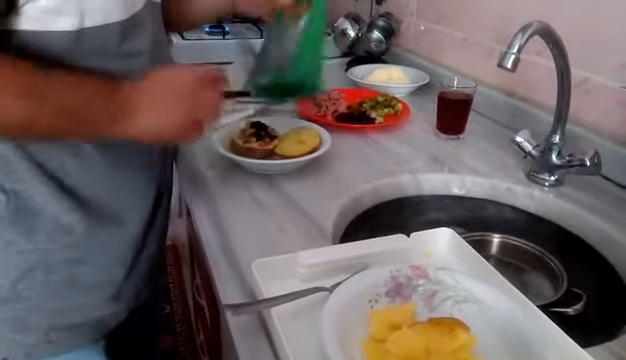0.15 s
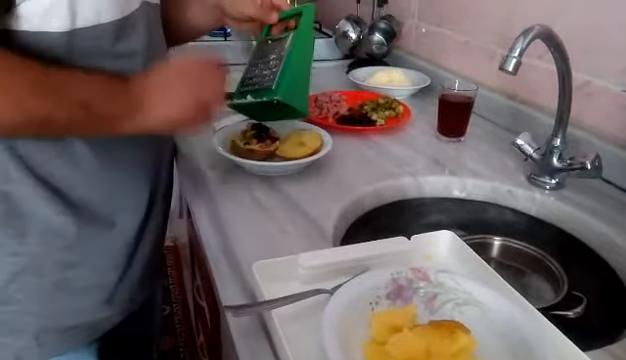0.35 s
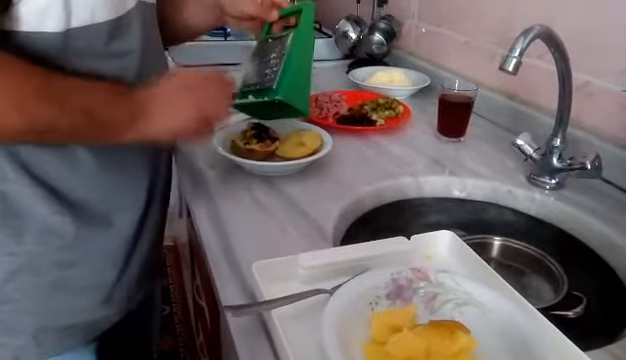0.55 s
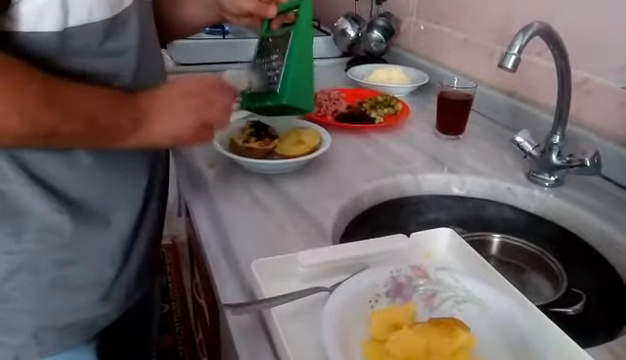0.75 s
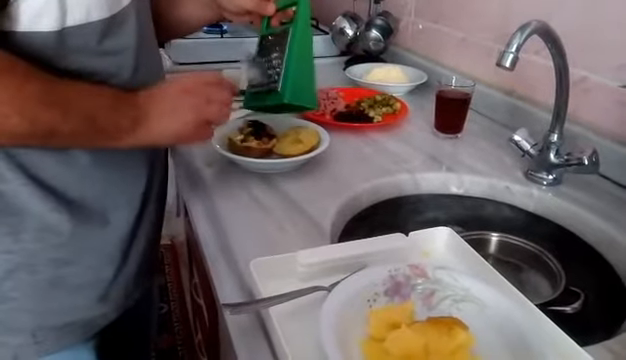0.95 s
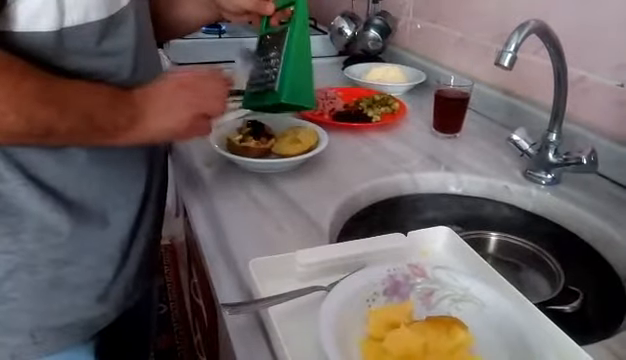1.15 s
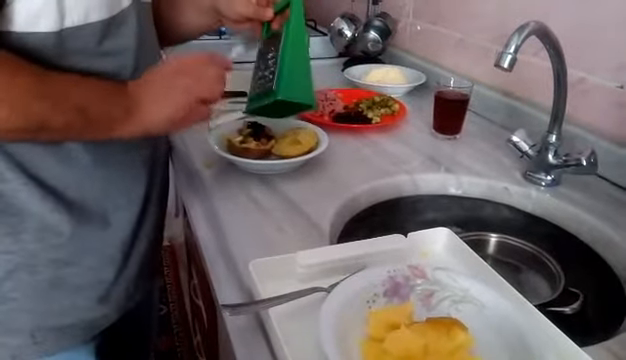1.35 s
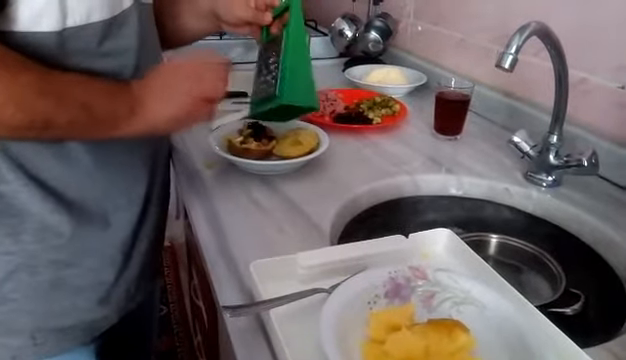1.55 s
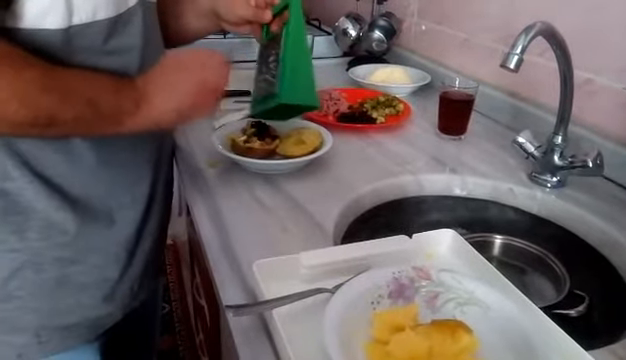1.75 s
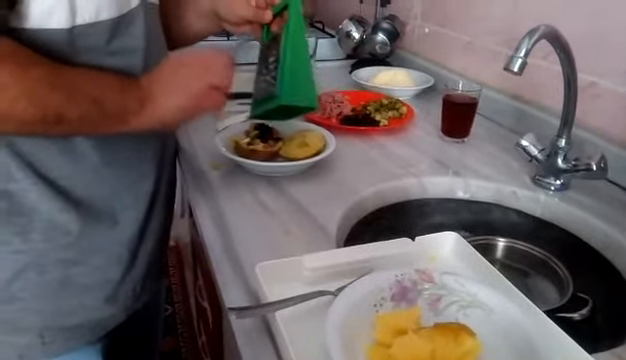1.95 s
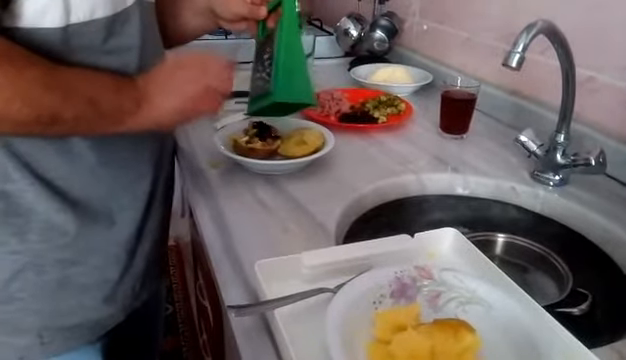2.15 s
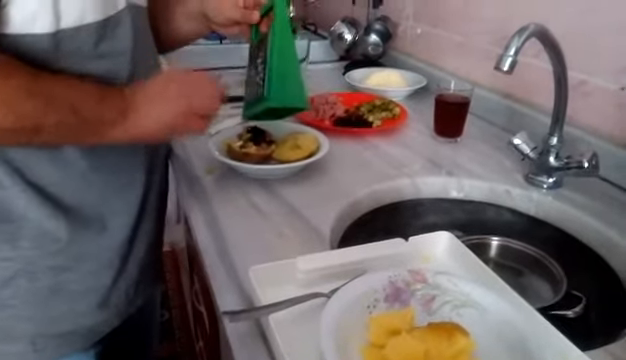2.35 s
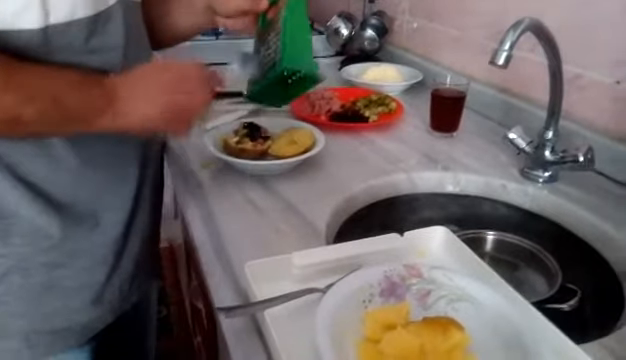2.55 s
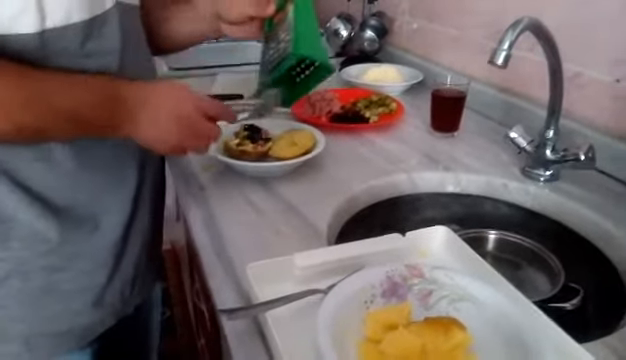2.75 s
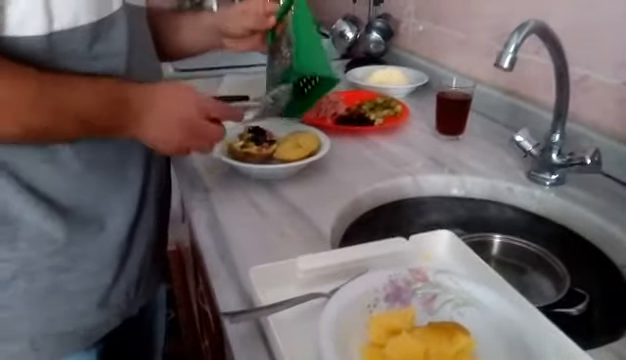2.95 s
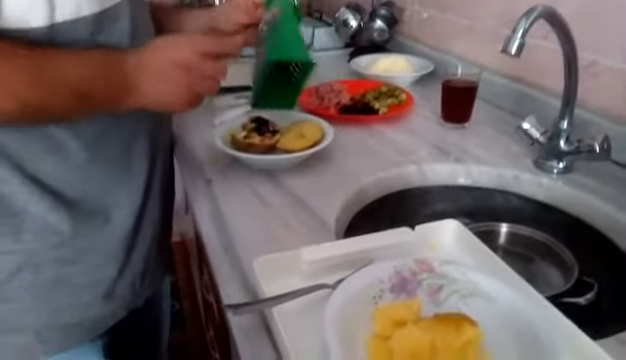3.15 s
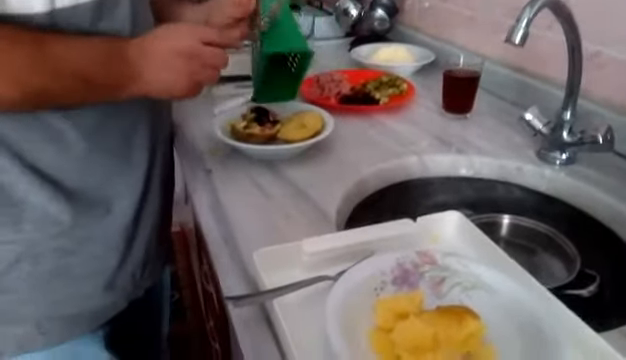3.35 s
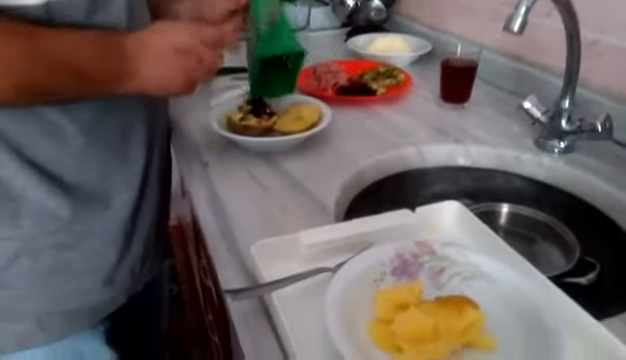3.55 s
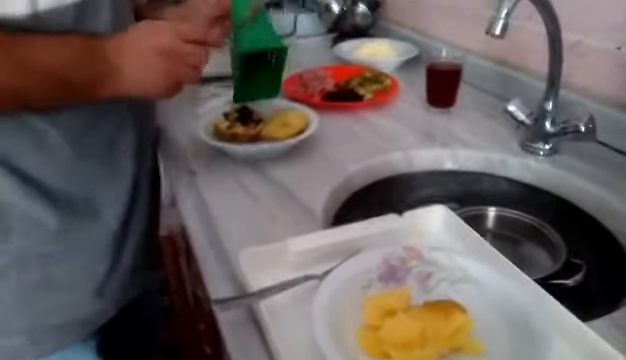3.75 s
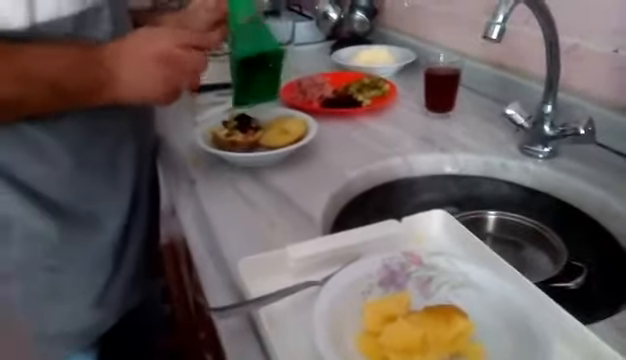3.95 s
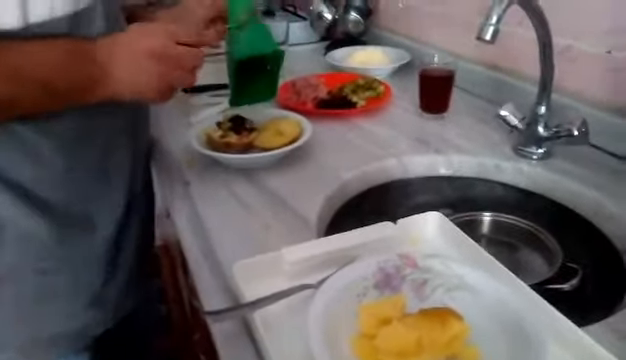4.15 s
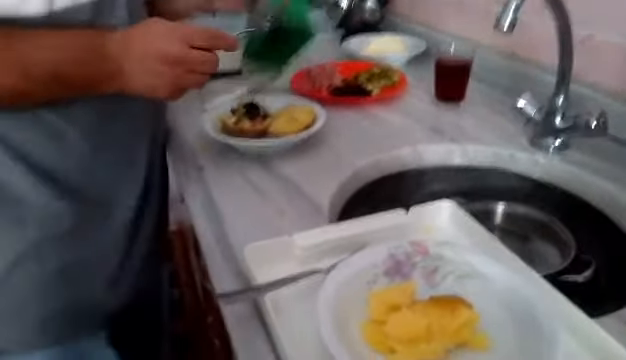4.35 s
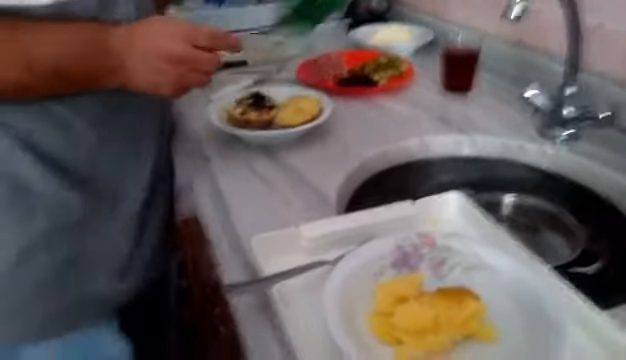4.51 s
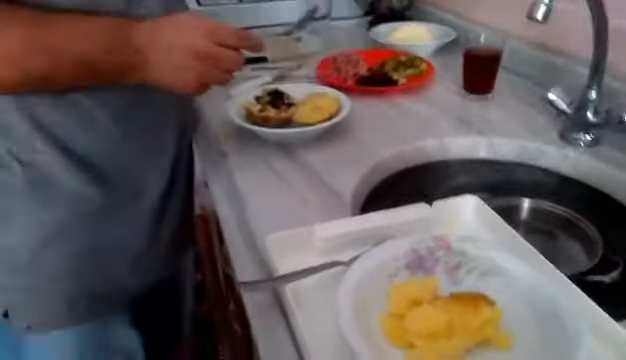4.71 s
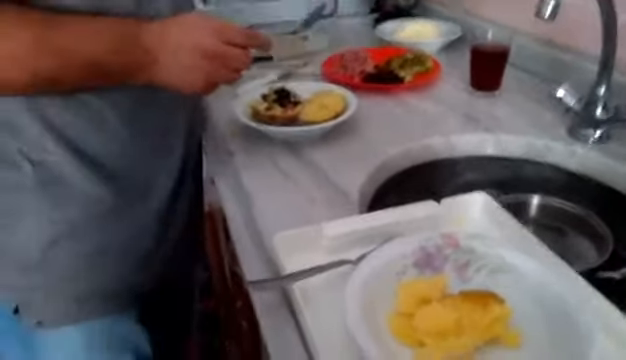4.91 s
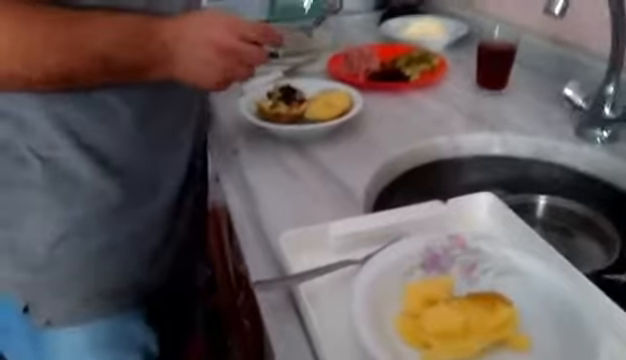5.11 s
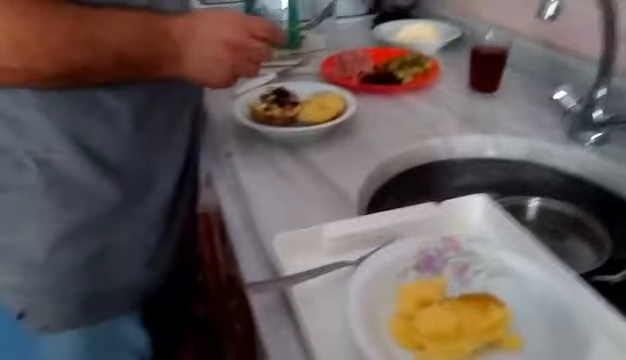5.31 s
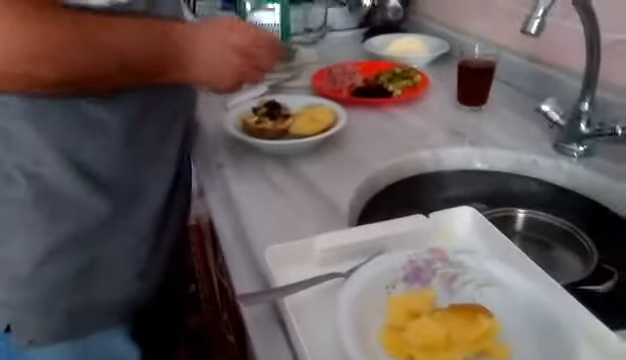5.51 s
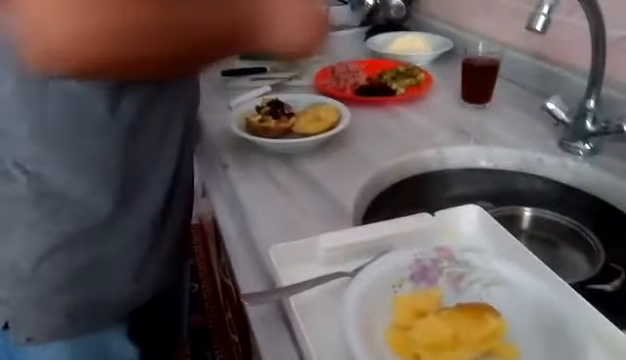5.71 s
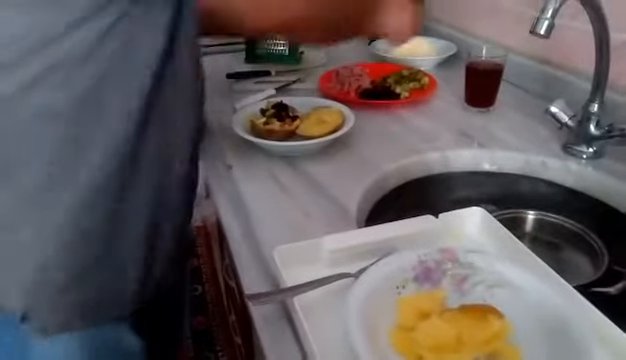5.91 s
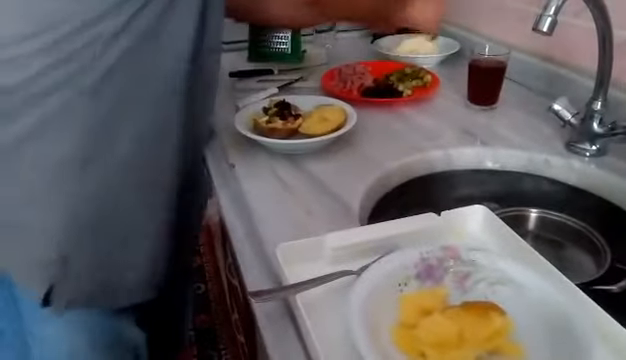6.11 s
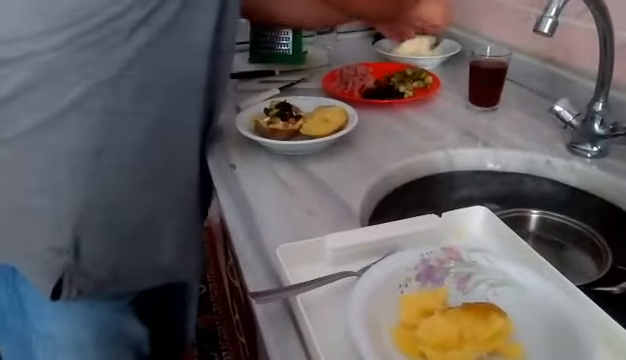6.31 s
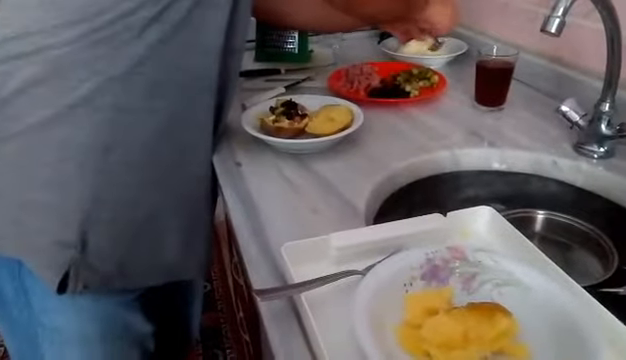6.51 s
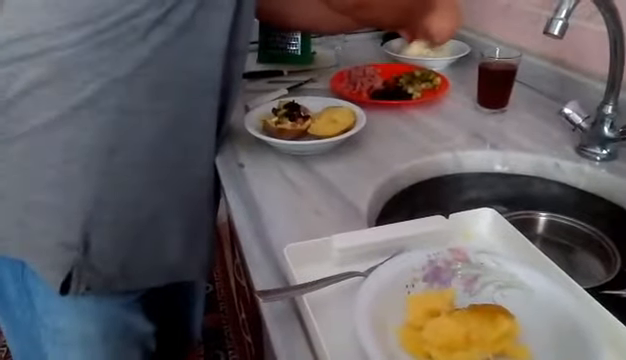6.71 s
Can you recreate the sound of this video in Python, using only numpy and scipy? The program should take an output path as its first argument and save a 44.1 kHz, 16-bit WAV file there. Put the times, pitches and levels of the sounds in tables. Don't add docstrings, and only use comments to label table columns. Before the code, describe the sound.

A small, hard-tiled kitchen, heard through a bright, slightly hissy close microphone, with a low wavering refrigerator hum behind. After faint contact ticks, at about 0.45 s a knife handle starts rapping a hollow sheet-metal box grater: six loud blows, roughly six per second, until 1.25 s. Each is a sharp, tinny clang with loose rattle, brief ringing, a hollow boxy swell and short echo. A second run of six, at a changed pitch, goes from 1.5 to 2.4 s, slightly uneven. The ring dies away, with tiny ticks near 2.9 and 3.2 s. A faint touch at 3.4 s leads into four strong raps from 3.55 to 4.05 s. Then it is quiet: a light blade scrape peaks near 4.7 s, another near 5.25 s, and the grater rubs and clunks softly onto the counter around 5.4 s. A faint high rustle of shreds swells near 6.2 s, with a soft dish tap at 6.3 s, leaving hum and hiss.

```python
import sys
import numpy as np
from scipy import signal
from scipy.fft import rfft, irfft
from scipy.io import wavfile
from scipy.ndimage import map_coordinates

SR = 44100
rng = np.random.default_rng(int(sys.argv[2]) if len(sys.argv) > 2 else 0)


def boost_factor(decibels):
    exponent = np.asarray(decibels, float) / 20
    return 10 ** exponent


def inscribe(sig):
    pcm = np.round(np.clip(np.atleast_2d(sig).T, -1, 1) * 32767)
    wavfile.write(sys.argv[1], SR, pcm.astype(np.int16))


N = 298557
RAP_SAMPLES = 2 ** 15
BOX_SWELL_S = 0.02

# frequency in Hz, level in dB per Hz.
RAP_SPECTRUM = [(150, -28), (300, -12), (550, -12.5), (850, -11.5), (1000, -6), (1500, 2.5), (2090, -8),
                (2500, -8), (6170, -3.5), (8130, -21.5), (13600, -35), (14800, -22.5), (15600, -56),
                (16100, -48)]


def rms_one(x):
    return x / np.sqrt(np.mean(x ** 2) + 1e-20)


def at_hz(points, hz):
    p = np.array(points)
    return np.interp(np.log(np.maximum(hz, 1)), np.log(p[:, 0]), p[:, 1])


def colour(x, *spectra):
    hz = np.fft.rfftfreq(len(x), 1 / SR)
    log_gain = sum(at_hz(s, hz) for s in spectra) * np.log(10) / 20
    cepstrum = irfft(log_gain, len(x))
    cepstrum[1:len(x) // 2] *= 2
    cepstrum[len(x) // 2 + 1:] = 0
    return irfft(rfft(x) * np.exp(rfft(cepstrum)), len(x))


def decay(t, t60):
    return boost_factor(-60 * t / t60)


def drift(rate):
    knots = rng.standard_normal(int(40 * N / SR))
    return map_coordinates(knots, [np.arange(N) / SR * rate + 2], order=3)


def add(out, s, x):
    i = round(s * SR)
    out[i:i + len(x)] += x[:N - i]


def raps():
    # low boom in dB, middle clang in dB, upper ring in dB.
    blows = [(0.462, -5, 1, -3, 0.2), (0.619, -7, -3.5, -1, -4.5), (0.773, -5.5, -1, 0.1, 2),
             (0.929, -2, -1, 0.5, 3), (1.084, -6.5, 0.5, -5.5, 4.9), (1.246, -4, 0, -2.5, 1.5),
             (1.529, -2, 0.9, 0, 2.5), (1.692, -3, 3.5, 1, -1.5), (1.912, -4, 0, -6.5, -3.5),
             (2.079, -3.5, 2, -10.5, 0.6), (2.23, -3.5, 1, -0.5, 2), (2.387, -3, 2.5, 2, -0.5),
             (3.408, -33, 17, 8, -1), (3.545, -1.5, 3, -2.3, -0.5), (3.723, -1, -1.5, -3.5, 1.7),
             (3.879, -2, 0.6, -4.5, 4), (4.045, -1, 0, -2, 3), (5.365, -28, 9.5, 7.5, -2),
             (5.382, -26.5, -4, -6, -4)]
    turns_s = [
        1.4,
        3.0,
        5.0,
    ]
    out, t = np.zeros(N), np.arange(RAP_SAMPLES) / SR
    rooms = kitchen(count=len(blows), first_echo_s=0.0055)
    for (s, db, boom_db, clang_db, ring_db), room in zip(blows, rooms):
        wall = np.searchsorted(turns_s, s) % 3
        firm = db > -20
        ring, lasting, air_chance = wall_ring(wall, t)
        rattle = sheet_rattle(t)
        rung_room = irfft(rfft(ring + 0.69 * rattle) * rfft(room), RAP_SAMPLES)

        heard = rattle + ring + boost_factor(-6) * firm * lasting + boost_factor(-7) * room + boost_factor(-33.5) * rung_room
        heard = colour(heard, RAP_SPECTRUM, blow_shade(wall, db, boom_db, clang_db, ring_db))
        heard /= np.sqrt(np.mean(heard[:SR // 60] ** 2))
        heard += box_air(t, boom_db, air_chance) + handle_thump(wall, t)

        i = round(s * SR)
        dip = np.clip(np.arange(4700) / 500, 0, 1)
        out[i - 700:i + 4000] *= boost_factor(-8.5 * firm * dip)
        add(out, s, heard * boost_factor(db - 13))
    return out


def wall_ring(wall, t):
    # frequency in Hz, level in dB, t60 in the room in seconds.
    walls = [
        [(750, -17, .3), (990, -8, .2), (1180, -3, .15), (1265, -8, .25), (1510, -4, .22), (2030, -2, .16),
         (2130, -3, .14), (2820, -8, .15), (4300, -8, .15), (5700, -6, .15), (6075, -4, .12)],
        [(750, -14, .3), (985, -4, .25), (1175, -7, .15), (1395, -6, .3), (1520, -5, .2), (1625, -7, .3),
         (2010, -3, .2), (2840, -8, .15), (4300, -6, .12), (5680, -5, .12), (5900, -6, .15)],
        [(555, -16, .4), (755, -16, .35), (1005, -7, .2), (1180, -4, .15), (1390, -1, .35), (1620, -2, .4),
         (1900, -5, .15), (2690, -8, .18), (4230, -8, .15), (5990, -4, .15), (6300, -6, .15)],
    ]
    modes = np.array(walls[wall])
    chance = rng.standard_normal((3, len(modes)))
    hz = modes[:, 0] * (1 + 0.005 * chance[0])
    modes_db, strike_spread_db = -15, 4
    mode_db = modes[:, 1] - at_hz(RAP_SPECTRUM, hz) + modes_db + strike_spread_db * chance[1]
    height = boost_factor(mode_db)
    box_fed = np.minimum(t / BOX_SWELL_S, 1) ** 2
    waves = np.sin(2 * np.pi * np.outer(hz, t)) * np.where(hz[:, None] < 1100, box_fed, 1)
    t60 = modes[:, 2:]
    ring = height @ (waves * decay(t, np.minimum(0.2 * t60, 0.05)))
    lasting = height * (hz < 2400) @ (waves * decay(t, np.minimum(t60, 0.4)))
    return ring, lasting, chance[2, 0]


def sheet_rattle(t):
    rattle = rng.standard_normal(RAP_SAMPLES) * decay(t, 0.11) * np.clip(t / 0.001, 0, 1)
    return rattle * boost_factor(2.5 * np.repeat(rng.standard_normal(512), 64))


def blow_shade(wall, db, boom_db, clang_db, ring_db):
    shade_hz = [500, 1030, 1500, 2080, 3500, 5900, 9000]
    # usual colour in dB near 1.0, 1.5, 2.1 and 6 kHz.
    wall_shades = [
        (-2.5, -2, 1.3, 5.2),
        (-5, -4, 2.1, 4.66),
        (-4, 2, 2.4, 3.9),
    ]
    soft_dulls = 0.04
    low, mid, upper, top = np.array(wall_shades[wall]) + [boom_db, clang_db, ring_db, soft_dulls * db]
    return list(zip(shade_hz, [1.21 * low, low, mid, upper, 0, top, top]))


def box_air(t, boom_db, chance):
    box_hz, box_db, sag = 968.7, -16, 0.16
    swell = (t / BOX_SWELL_S * np.exp(1 - t / BOX_SWELL_S)) ** 3
    sagging = t + sag * BOX_SWELL_S / 2 * (1 - np.exp(-2 * t / BOX_SWELL_S))
    tone = np.sin(2 * np.pi * box_hz * (1 + 0.028 * chance) * sagging)
    return boost_factor(box_db + boom_db) * swell * tone


def handle_thump(wall, t):
    thump_hz = [307, 301, 211]
    thump_db = [-22, -24.5, -25.5]
    thump = np.sin(2 * np.pi * thump_hz[wall] * t) * decay(t, 0.11)
    return boost_factor(thump_db[wall]) * thump * np.clip(t / 0.011, 0, 1)


def kitchen(count, first_echo_s):
    edges_hz = [140, 400, 800, 1300, 2300, 4500, 8000, 13000, 18000]
    # frequency in Hz, t60 in seconds.
    room_t60 = [(300, 0.53), (1400, 0.42), (3700, 0.34), (7000, 0.27), (10000, 0.21), (15000, 0.18)]
    t = np.arange(RAP_SAMPLES) / SR
    echoes = np.zeros((count, RAP_SAMPLES))
    for low, high in zip(edges_hz, edges_hz[1:]):
        band_filter = signal.butter(2, [low, high], "band", fs=SR, output="sos")
        band = signal.sosfilt(band_filter, rng.standard_normal(RAP_SAMPLES))
        dying = decay(t, at_hz(room_t60, np.sqrt(low * high)))
        echoes += [np.roll(band, 1511 * k) * dying for k in range(count)]
    echoes[1:] = 0.6 * echoes[0] + 0.8 * echoes[1:]
    return echoes * np.clip(t / first_echo_s - 1, 0, 1)


def ticks():
    # start in seconds, peak in dB, ring in Hz, t60 in seconds.
    contacts = [(.0800, -41.5, 3200, 0.04), (0.0815, -28, 480, 0.014), (0.908, -30, 2530, .003),
                (0.919, -20.5, 3070, 0.0045), (0.919, -16, 3030, 0.0014), (2.923, -51.5, 4080, 0.065),
                (3.2106, -44, 5900, 0.0086), (3.2108, -55, 10920, 0.0038), (3.411, -31, 1505, 0.046),
                (5.370, -25.5, 993, 0.062), (5.384, -38, 3600, 0.054), (5.447, -47, 1010, 0.09),
                (5.394, -36, 2430, 0.018), (5.538, -48, 4250, 0.079), (5.538, -46, 6670, .02),
                (5.800, -50, 5400, .02), (6.281, -31, 503, 0.023), (6.281, -38, 280, 0.07),
                (6.282, -42.5, 1760, 0.012), (6.2815, -43, 950, 0.013)]
    click_spectrum = [(300, 4), (1500, 1.0), (6500, 7.5), (8500, -12), (13000, -42), (15000, -14)]   # (Hz, dB)
    out, t = np.zeros(N), np.arange(SR // 5) / SR
    for s, db, hz, t60 in contacts:
        click = min(hz / 2000, 1.3) * rng.standard_normal(len(t)) * decay(t, 0.0008 + 0.26 * t60)
        ring_up = np.minimum(t / (0.094 * t60), 1)
        ring = np.sin(2 * np.pi * hz * t) * decay(t, t60) * ring_up
        add(out, s, boost_factor(db) * (ring + colour(click, click_spectrum)))
    room = kitchen(count=1, first_echo_s=0.004)[0]
    return out + boost_factor(-45) * signal.fftconvolve(out, room)[:N]


def scrape():
    grains = rng.standard_normal(2 ** 19) * boost_factor(1.4 * rng.exponential(1, 2 ** 19))
    return blade(grains) + foot(grains) + shreds(grains)


def blade(grains):
    # end in seconds, level in dB, hold in seconds.
    strokes = [
        (4.34, -76, 0.02),
        (4.735, -52.5, 0.026),
        (5.27, -60.5, 0.045),
        (6.76, -69, 0.02),
    ]
    # frequency in Hz, width in Hz, level in dB.
    resonances = [(2210, 55, -11), (2960, 350, -9.5), (4200, 130, -7), (5150, 68, -15), (6140, 120, -31),
                  (6900, 100, -16)]
    # frequency in Hz, level in dB per Hz.
    blade_spectrum = [(710, -54), (1200, -1.5), (2180, -1.5), (3490, -11.5), (4170, -8.5), (6340, 1.5),
                      (8140, -20), (13000, -33)]
    rings = np.zeros(len(grains))
    for hz, width, db in resonances:
        b, a = signal.iirpeak(hz, hz / width, SR)
        rings += 3 * boost_factor(db + 8) * signal.lfilter(b, a, grains)
    return pressure(strokes) * rms_one(colour(grains + rings, blade_spectrum))[:N]


def foot(grains):
    # end in seconds, level in dB, hold in seconds.
    drags = [
        (5.33, -59.5, 0.14),
    ]
    # frequency in Hz, level in dB per Hz.
    foot_spectrum = [(330, -35), (480, 7), (650, -0.5), (900, -10), (1500, -40)]
    return pressure(drags) * rms_one(colour(grains, foot_spectrum))[:N]


def shreds(grains):
    # end in seconds, level in dB, hold in seconds.
    rustles = [
        (6.27, -67, 0.27),
        (6.45, -82, 0.1),
    ]
    # frequency in Hz, level in dB per Hz.
    shred_spectrum = [(2000, -25), (4200, -33), (6000, -9), (7200, -12.5), (8140, -31.5), (13000, -34)]
    return pressure(rustles) * boost_factor(3.7 * drift(8)) * rms_one(colour(grains, shred_spectrum))[:N]


def pressure(rows):
    swell_db_per_s, stop_db_per_s = 26.5, 183
    t = np.arange(N) / SR
    total = np.zeros(N)
    for end, db, hold in rows:
        before = np.maximum(end - hold - t, 0)
        after = np.maximum(t - end, 0)
        total += boost_factor(db - swell_db_per_s * before - stop_db_per_s * after)
    return total


def refrigerator():
    # multiple of the compressor rate, level in dB rms.
    harmonics = [(1, -73.5), (2, -56.5), (5, -72.5), (6, -68), (7, -59.5), (8, -57.5), (9, -98),
                 (11, -68.5), (12, -76.5)]
    compressor_hz, mains_hz, mains_db, mains_lead_s = 48.77, 99.99, -63.5, 0.0001
    turn = 2 * np.pi * np.arange(N) / SR
    hum = boost_factor(mains_db + 1.2 * drift(5)) * np.sin(mains_hz * (turn + 2 * np.pi * mains_lead_s))
    for multiple, db in harmonics:
        level = boost_factor(db + 2.05 * drift(2.6))
        phase = 2 * np.pi * rng.random() * (multiple != 2)
        hum += level * np.sin(multiple * compressor_hz * turn + phase)
    return np.sqrt(2) * hum


def hiss():
    # frequency in Hz, level in dB per Hz.
    hiss_spectrum = [(20, -25), (42, -10), (65, -10.5), (110, -9), (280, -13.5), (370, -12.5), (500, -16),
                     (1010, -22), (3150, -27.5), (6380, -24.5), (8140, -42.5), (13600, -47.5),
                     (15400, -36.5), (16200, -40)]
    white = rng.standard_normal(2 ** 19)
    return boost_factor(-55.5 + 0.13 * drift(4.07)) * rms_one(colour(white, hiss_spectrum)[:N])


def scene():
    return (raps() + ticks() + scrape() + refrigerator() + hiss())[None]


def low_pass(x):
    return signal.sosfilt(signal.butter(12, 16810, fs=SR, output="sos"), x)


def record(dry):
    bass_cut = signal.sosfilt(signal.butter(2, 40, "high", fs=SR, output="sos"), dry)
    rounded = np.tanh(bass_cut)
    top_cut = signal.cheby2(16, 60, 16900, fs=SR, output="sos")
    return low_pass(signal.sosfilt(top_cut, rounded))


dry = scene()
out = record(dry)
inscribe(out)
```